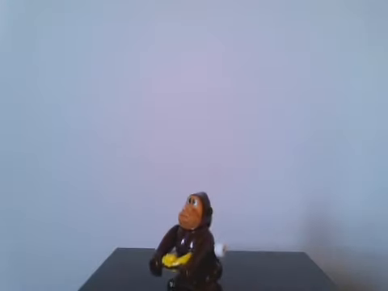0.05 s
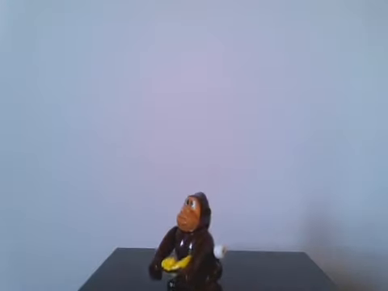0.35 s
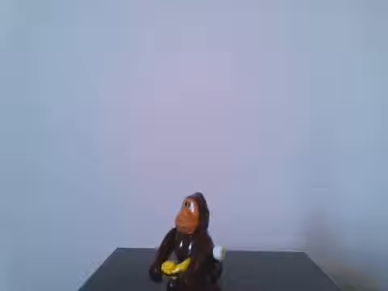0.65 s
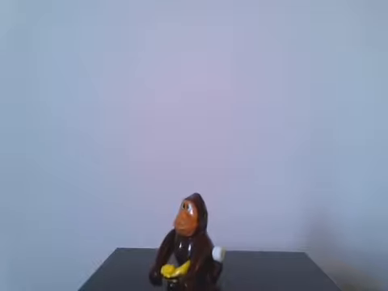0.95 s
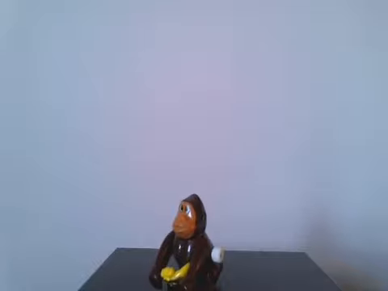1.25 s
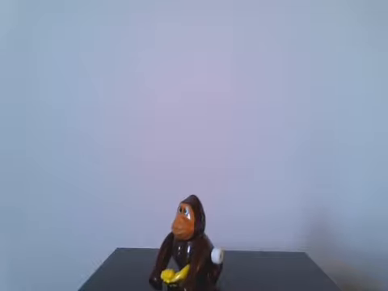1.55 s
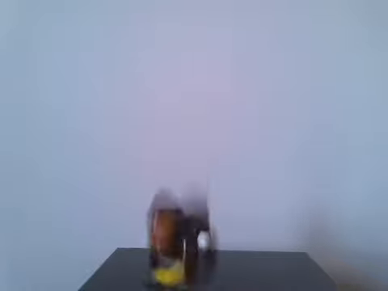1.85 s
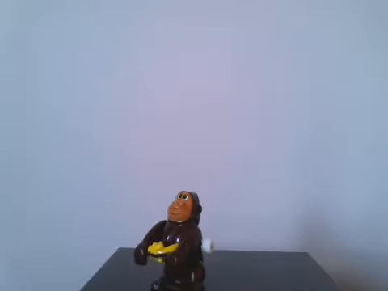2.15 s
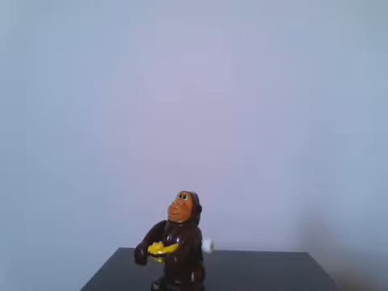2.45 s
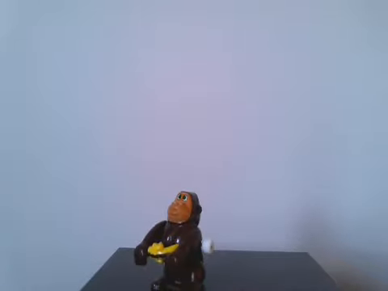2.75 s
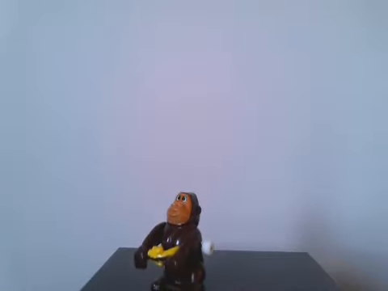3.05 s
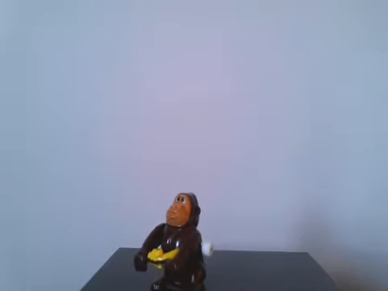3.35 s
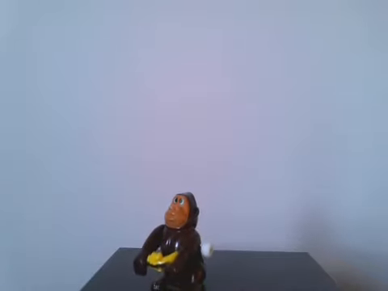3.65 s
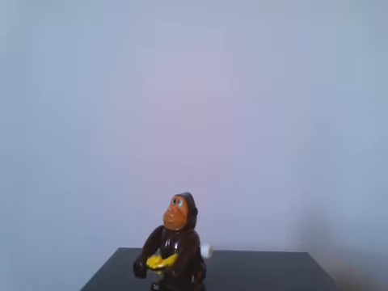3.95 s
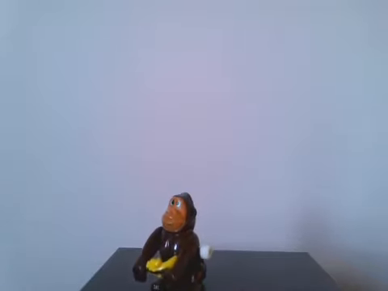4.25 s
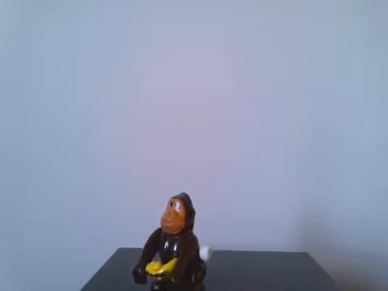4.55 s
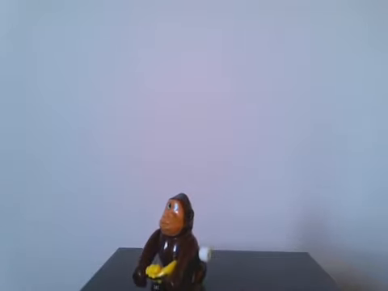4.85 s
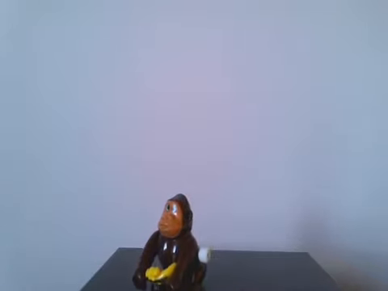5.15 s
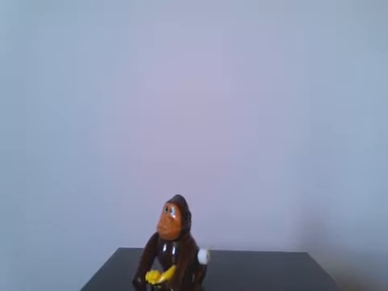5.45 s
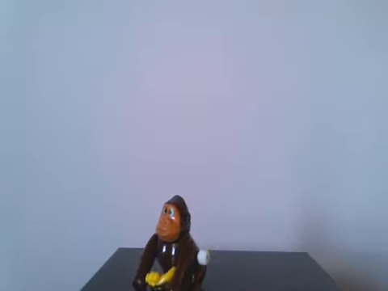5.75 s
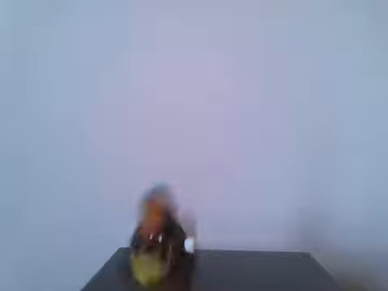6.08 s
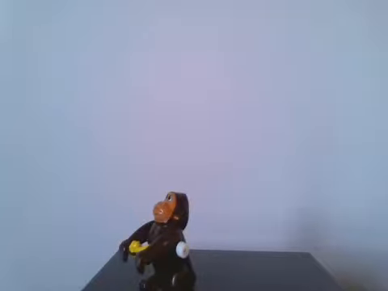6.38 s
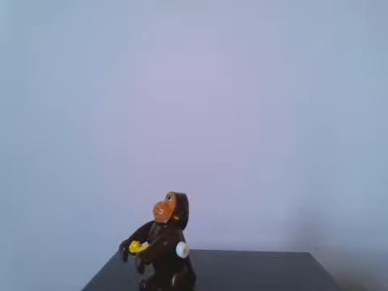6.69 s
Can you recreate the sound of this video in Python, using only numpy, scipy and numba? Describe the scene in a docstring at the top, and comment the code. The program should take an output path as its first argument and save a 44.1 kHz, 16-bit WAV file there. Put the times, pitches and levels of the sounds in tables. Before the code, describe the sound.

A plastic wind-up toy whirs faintly on a hard tabletop in a small, quiet room. The gears slow and rasp a little as the spring loads, then a catch snaps and the toy flips, landing with a loud, sharp double clack. The whir carries on for about four seconds, with tiny foot scuffs, before a second snap and clattering landing. The nearby microphone overloads slightly on the landings, and the impacts die away quickly.

```python
"""A plastic wind-up toy leans forward on a hard table in a small room, its gear train whirring.
The whir slows as a cam bends the rasping leg spring, then quickens as the load eases.
The catch snaps, the toy flies for a sixth of a second, lands, bounces and rocks to rest; each impact
excites shell, table and room. It leans again, feet scuffing, and turns a second backflip.
Throughout, a noise suppressor lifts only the strong sounds, which cuts the tails short."""
import sys
import numpy as np
from scipy import signal
from scipy.fft import rfft, irfft, next_fast_len
from scipy.io import wavfile
from scipy.ndimage import uniform_filter1d
from numba import njit

SR = 44100
rng = np.random.default_rng(int(sys.argv[2]) if len(sys.argv) > 2 else 0)


def log_audio(samples):
    """Write samples as a 16-bit WAV file to the path given in sys.argv[1]."""
    # one column per channel
    frames = np.atleast_2d(samples).T
    # limit to full scale, then quantise
    limited = np.clip(frames, -1, 1)
    pcm = np.round(limited * 32767).astype(np.int16)
    wavfile.write(sys.argv[1], SR, pcm)


N = 296352
T = np.arange(N) / SR


def undb(db):
    """Logarithmic level: decibels to an amplitude ratio."""
    return 10 ** (np.asarray(db) / 20)


def unit(x):
    """Normalisation to an rms of 1."""
    return x / np.sqrt(np.mean(x ** 2))


def decay(t, t60):
    """Exponential damping, 60 dB down after t60."""
    return np.exp(-np.log(1000) * t / t60)


def add(out, start_s, x):
    """Superposition: mix x into out from start_s."""
    i = max(int(start_s * SR), 0)
    out[i:i + len(x)] += x[:N - i]


def lookup(points, hz):
    """Interpolation of (frequency, value) points on a log-frequency axis."""
    f, value = np.transpose(points)
    return np.interp(np.log(hz + 1), np.log(f), value)


def colour(x, points, peaks=(), tilt_db=0):
    """Minimum-phase filter of unit power: a spectrum, resonant peaks and a tilt per octave above 500 Hz."""
    n = next_fast_len(len(x))
    n += n % 2
    hz = np.arange(n // 2 + 1) * SR / n
    db = lookup(points, hz) + tilt_db * np.log2(np.maximum(hz, 500))
    for f, width, height_db in peaks:
        db = db + height_db / (1 + (2 * (hz - f) / width) ** 2)
    cepstrum = irfft(np.log(unit(undb(db))))
    cepstrum[1:n // 2] *= 2  # folding the cepstrum makes the filter causal
    cepstrum[n // 2 + 1:] = 0
    return irfft(rfft(x, n) * np.exp(rfft(cepstrum)))[:len(x)]


def whiten(x):
    """Whitening in third octaves: a flat spectrum of unit energy that keeps its fine comb of peaks."""
    spectrum = rfft(x)
    hz = np.arange(len(spectrum)) * SR / len(x)
    band = (3 * np.log2(np.maximum(hz, 100) / 100)).astype(int)
    power = np.bincount(band, np.abs(spectrum) ** 2) / np.bincount(band)
    centre_hz = np.bincount(band, hz) / np.bincount(band)
    flat = colour(x, np.column_stack([centre_hz, -10 * np.log10(power)]))
    return flat / np.sqrt(np.sum(flat ** 2))


@njit
def bandpass(x, hz, width_hz):
    """Second-order resonator in state-variable form; its centre may move."""
    y, band, low = np.empty(len(x)), 0., 0.
    for i in range(len(x)):
        g, damping = np.tan(np.pi * hz[i] / SR), width_hz / hz[i]
        v = (band + g * (x[i] - low)) / (1 + g * (g + damping))
        band, low = 2 * v - band, low + 2 * g * v
        y[i] = damping * v
    return y


def resonate(x, hz, width_hz):
    """Two equal resonators in cascade, each width_hz wide, give steeper skirts."""
    centre = np.full(len(x), hz, dtype=float)
    return bandpass(bandpass(x, centre, float(width_hz)), centre, float(width_hz))


# spectrum of still room air (frequency [Hz], relative level [dB])
AIR_SPECTRUM = [(25, -30.5), (60, -13), (130, 0.5), (200, 1.5), (380, -5.5), (560, -5.5), (900, -16.5),
                (1500, -18), (5000, -14), (16000, -34.5)]
# resonances of table and room (frequency [Hz], width [Hz], gain [dB])
HOLLOW_PEAKS = [(120, 20, 3.5), (285, 17, 4.5), (367, 50, -2.5), (457, 22, 9), (589, 25, 8), (766, 28, 5.5),
                (960, 76, 5)]
def air(level_db=-65.5):
    """Filtered broadband noise: the quiet low rush of the room."""
    return undb(level_db) * colour(rng.standard_normal(N), AIR_SPECTRUM, HOLLOW_PEAKS)


# dull hums of the tabletop, scuffs of the feet as the weight shifts, a longer hum of the tabletop swelling
# before the first jump # each (centre time [s], duration [s], frequency [Hz], crest level [dB])
TABLE_HUMS = [(.21, .18, 285, -61.5), (.745, .12, 298, -59), (1.055, .14, 139, -60.5),
              (1.29, .13, 159, -61.5), (1.4, .08, 152, -62), (1.5, .16, 157, -59.5),
              (2.215, .06, 186.5, -59), (3.76, .26, 292, -64), (5.21, .13, 159.4, -63),
              (5.32, 0.077, 300, -63)]
FOOT_SCUFFS = [(2.91, .22, 4993, -64.5), (3.4, 0.039, 3222, -63), (3.45, .06, 4100, -62),
               (3.54, .15, 3927, -57.5), (3.64, .16, 3965, -64.5), (3.775, .045, 3916, -61)]
TABLE_SWELLS = [(1.705, .24, 523, -58.5)]
def rubbing(events, width_hz):
    """Forced resonance: friction noise swells and fades in one narrow band."""
    out = np.zeros(N)
    for centre_s, length_s, hz, db in events:
        n = int(length_s * SR)
        rub = resonate(rng.standard_normal(2 * n), hz, width_hz)[n:]  # steady state only
        swell = np.hanning(n)
        add(out, centre_s - length_s / 2, undb(db) * unit(rub * swell) * np.sqrt(np.mean(swell ** 2)))
    return out


FREE_HZ = 569  # tooth rate of the unloaded gears
# the cam pushes from LOAD_S before release to RUNOUT_S after; skew over 1 delays the hardest push
LOAD_S, RUNOUT_S, LOAD_SKEW = 3.5, .2, 1.05
STAND_S, LEAN_S = 0.41, 1.7  # after landing the toy stands upright, then leans forward
# backflips (release [s], landing [s], slowest tooth rate [Hz], whir change at the new spot [dB])
FLIPS = [(1.785, 1.944, 270, -0.35), (5.992, 6.156, 212, -3)]
def motion():
    """Speed falls with load. Gives load 0-1, tooth rate [Hz], uprightness 0-1, flight 0-1, spot [dB]."""
    load, upright, flight, spot_db = np.zeros((4, N))
    tooth_hz = np.full(N, float(FREE_HZ))
    for release_s, landing_s, slowest_hz, change_db in FLIPS:
        turn = np.clip((T - release_s + LOAD_S) / (LOAD_S + RUNOUT_S), 0, 1)
        push = np.abs(np.sin(np.pi * turn ** LOAD_SKEW))
        load += push
        tooth_hz -= (FREE_HZ - slowest_hz) * push
        flight_s = landing_s - release_s
        upright += np.interp(T, np.cumsum([release_s, flight_s, STAND_S, LEAN_S]), [0, 1, 1, 0])
        flight += uniform_filter1d(1. * ((T > release_s) & (T < landing_s)), size=900)
        spot_db += change_db * np.clip((T - release_s) / flight_s, 0, 1)
    return load, tooth_hz, np.clip(upright, 0, 1), flight, spot_db


def gear_mesh(tooth_hz, paths, jitter=0.04, scatter_db=-1.5, limp=.24, tick_s=0.00093, rub=.7):
    """Amplitude-modulated noise, one row per path: each tooth ticks, then rubs, more at speed."""
    wobble = unit(uniform_filter1d(rng.standard_normal(N), size=300))
    passed = np.cumsum(tooth_hz * (1 + jitter * wobble)) / SR
    tooth = passed.astype(int)
    force = undb(scatter_db * rng.standard_normal(N)[tooth])
    force *= 1 + limp * (-1.) ** tooth  # every other tooth is stronger
    sway = undb(-0.53 * np.sin(2 * np.pi * passed / 22))  # a 22-tooth wheel runs out of true
    contact = rub * tooth_hz / FREE_HZ + force * np.exp(-(passed % 1) / tooth_hz / tick_s)
    running_rms = np.sqrt(uniform_filter1d(contact ** 2, size=4410))
    return unit(rng.standard_normal((paths, N)) * sway * contact / running_rms)


def spring_rasp(centre_hz=3850, width_hz=900, loaded_db=-69, slack_db=-95):
    """Sliding friction: the spring's coils rub tooth by tooth, most under full load."""
    load, tooth_hz, *_ = motion()
    rub = gear_mesh(tooth_hz, paths=1)[0]
    return undb(slack_db + (loaded_db - slack_db) * load) * unit(resonate(rub, centre_hz, width_hz))


# case resonances in three postures (frequency [Hz], width [Hz], gain [dB])
LEANING_PEAKS = [(2490, 160, 5), (3400, 220, 2.5), (4070, 260, 5.5), (4870, 170, 6.5), (5750, 320, 8),
                 (6890, 240, 6.5), (8904, 600, 3.5), (10700, 500, 2)]
HALFWAY_PEAKS = [(2540, 300, 7), (3363, 200, 3), (4000, 410, -6), (4760, 400, 4.5), (5700, 280, 4),
                 (6300, 400, 3.5), (7830, 440, 4), (9300, 500, 2.5)]
UPRIGHT_PEAKS = [(2520, 360, 2.2), (3500, 250, 1.2), (4770, 130, 2.7), (5900, 430, 8), (7840, 910, 5.1),
                 (8217, 110, 6), (11070, 700, 6.2), (15000, 700, 5)]
def through_case(x, spectrum, upright):
    """Resonance depends on shape: the case blends the peaks of the two nearest postures."""
    return sum(np.maximum(1 - np.abs(2 * upright - k), 0) * colour(x, spectrum, peaks)
               for k, peaks in enumerate([LEANING_PEAKS, HALFWAY_PEAKS, UPRIGHT_PEAKS]))


# spectra of the gearbox, the tooth sizzle and the body under it (frequency [Hz], relative level [dB])
GEARBOX_SPECTRUM = [(1500, -18), (2100, -10), (2700, -1.5), (4000, -0.5), (5700, -2.5), (7000, -4.5),
                    (8200, -8.5), (10000, -23), (16000, -35.5)]
SIZZLE_SPECTRUM = [(5000, -29), (8000, -7.5), (9200, 3), (11000, -4.5), (13500, -7), (15500, -14)]
BODY_SPECTRUM = [(300, -7.5), (560, 4), (900, 4.5), (1300, 1), (2100, 9), (3200, -19.5)]
# whir paths (free-running level [dB], rise with speed [dB/octave], upright gain [dB], mid-air gain [dB])
CASE_LEVELS = (-55, 7, -4, -5)
SIZZLE_LEVELS = (-67.5, 6.5, .3, -3.5)
BODY_LEVELS = (-69, 5, 2.5, -8.5)
SLOT_LEVELS = (-64.5, 10.5, 2, -4)
def gear_whir(slot_open_hz=7200, slot_shut_hz=5500):
    """Source and filter: tooth ticks sound through the case, the body and the slot above the legs."""
    load, tooth_hz, upright, flight, spot_db = motion()
    ticks, fine_ticks, slot_ticks = gear_mesh(tooth_hz, paths=3)

    def gain(free_db, speed_db, upright_db, flight_db):
        """Excitation and coupling: faster teeth hit harder; in mid-air the table carries no sound."""
        octaves = np.log2(tooth_hz / FREE_HZ)
        return undb(free_db + speed_db * octaves + upright_db * upright + flight_db * flight + spot_db)

    case = gain(*CASE_LEVELS) * through_case(ticks, GEARBOX_SPECTRUM, upright)
    sizzle = gain(*SIZZLE_LEVELS) * through_case(fine_ticks, SIZZLE_SPECTRUM, upright)
    body = gain(*BODY_LEVELS) * colour(ticks, BODY_SPECTRUM, HOLLOW_PEAKS)
    slot_hz = slot_open_hz + (slot_shut_hz - slot_open_hz) * load  # the cam presses the slot shut
    slot = gain(*SLOT_LEVELS) * unit(resonate(slot_ticks, slot_hz, width_hz=1500))
    return case + sizzle + body + slot


# reverberation of the room (frequency [Hz], T60 [s])
ROOM_DECAY = [(100, 0.99), (400, 0.35), (1100, 0.32), (2000, 0.27), (3600, 0.22), (6500, .175),
              (15000, 0.15)]
def reverberation(t, build_s=.003):
    """Diffuse field: dense echoes build up quickly and die sooner in the treble."""
    spectrum = rfft(rng.standard_normal(len(t)))
    hz = np.arange(len(spectrum)) * SR / len(t)
    octave = np.round(np.log2(np.maximum(hz, 100)))
    tail = sum(irfft(spectrum * (octave == k), len(t)) * decay(t, lookup(ROOM_DECAY, 2 ** k))
               for k in np.unique(octave))
    return tail * (1 - np.exp(-t / build_s))


def ring(modes, t, detune, scatter_db):
    """Modal superposition: each blow hits another spot, so strengths and pitches vary a little."""
    out = np.zeros(len(t))
    for k, (hz, db, t60) in enumerate(modes):
        level_draw, pitch_draw = rng.standard_normal(2)
        tone = np.sin(2 * np.pi * hz * (1 + detune * pitch_draw) * t)
        out += (-1) ** k * undb(db + scatter_db * level_draw) * decay(t, t60) * tone
    return out


# modes of the table (frequency [Hz], relative level [dB], T60 [s])
TABLE_MODES = [(74, -17.5, 0.8), (98, -12.5, .33), (131.7, -10, 0.51), (170.5, -9.5, 0.11),
               (183.3, -4, 0.36), (203, -7, 0.58), (234, -6, 0.21), (285, 2, 0.28), (437, -1.5, .17),
               (502, -5, 0.2), (526.5, -5, 0.23), (583, -11.5, 0.093)]
def table_ring(t, push_hz, rise_s=0.0076):
    """Plate vibration: a soft push moves only the low modes, and the heavy top is slow to get going."""
    modes = [(hz, db - 10 * np.log10(1 + (hz / push_hz) ** 4), t60) for hz, db, t60 in TABLE_MODES]
    return ring(modes, t, detune=0.0027, scatter_db=-2.5) * (1 - np.exp(-t / rise_s))


# modes of the hollow shell (frequency [Hz], relative level [dB])
SHELL_MODES = [(1205, 0.5), (1800, -5), (1900, -3), (2285, -5.5), (2395, -2.5), (2713, 1.5), (3040, -3.5),
               (3230, 4), (3810, -8), (4395, -8), (4810, -3.5), (5800, -2.5), (6100, 0), (6540, -1.5)]
def shell_ring(t, t60=.11):
    """Damped free vibration of the struck plastic shell."""
    return ring([(hz, db, t60) for hz, db in SHELL_MODES], t, detune=0.0017, scatter_db=-3.5)


def impacts(events, spectrum, peaks, crack_t60, rattle_db, room_db, shell_db, table_db, push_hz):
    """Impulsive excitation: each blow clicks, rattles loose parts, and rings shell, table and room."""
    out, t = np.zeros(N), np.arange(SR // 2) / SR
    for start_s, db, tilt_db, thump_db in events:
        grains = np.repeat(undb(4 * rng.standard_normal(len(t))), 24)[:len(t)]  # 4 dB of roughness
        crack = unit(grains * rng.standard_normal(len(t))) * decay(t, crack_t60)
        crack[0] += undb(11)  # the click of first contact
        rattle = undb(rattle_db) * whiten(crack + undb(room_db) * reverberation(t))
        shell = undb(shell_db) * shell_ring(t)
        table = undb(table_db + thump_db) * table_ring(t, push_hz)
        add(out, start_s, undb(db) * (colour(rattle, spectrum, peaks, tilt_db) + shell + table))
    return out


# catch and leg kicks (time [s], level [dB], tilt [dB/octave], relative table thump [dB])
KICKS = [(1.7853, -36, -2, -15), (1.7872, -30, 2, 1), (1.7935, -30.5, -3, -12), (1.7985, -33.5, 2, -12.5),
         (1.8022, -31, -0.5, -6), (5.9920, -30.5, -2.5, -6.5), (5.9975, -31.5, -3.5, -5.5),
         (6.0048, -28, -1, -5.5)]
# spectrum of the snap inside the shell (frequency [Hz], relative level [dB])
SNAP_SPECTRUM = [(60, -13.5), (130, 14), (280, 6.5), (360, -1), (500, 4.5), (900, -0.5), (1600, -2),
                 (2200, -0.5), (3200, 1.5), (4600, 1), (6600, -2.5), (7900, -10), (16000, -20)]
# resonances of the spring's snap (frequency [Hz], width [Hz], gain [dB])
SPRING_PEAKS = [(770, 26, 4.9), (1920, 300, 6.8), (2650, 400, 7.5), (6150, 700, 10)]
def take_offs():
    """Release of elastic energy: the catch lets go and the spring kicks the legs against the table."""
    return impacts(KICKS, SNAP_SPECTRUM, SPRING_PEAKS, crack_t60=0.022, rattle_db=16.0,
                   room_db=-16, shell_db=-34.5, table_db=-12.5, push_hz=300)


# the feet land, bounce and rock (time [s], level [dB], tilt [dB/octave], relative table thump [dB])
FOOTFALLS = [(1.9435, -16, 0.2, -12), (1.95, -9.5, 2.5, -10.5), (1.9797, -24, -8.5, -2),
             (1.9872, -28, 2.5, -3.5), (2.0279, -12, -1.4, -10.5), (6.1525, -14.5, 0, -9.5),
             (6.1601, -14, 0.3, -9), (6.182, -31, 2.5, -2.5), (6.2085, -10.5, -2, -7),
             (6.269, -29.5, 0.5, -4.5), (6.319, -37.5, 0, -4)]
# a rebound chatter after each blow (shortest delay [s], longest delay [s], relative level [dB], extra table
# thump [dB])
REBOUND = (.003, .006, -10, 3)
# spectrum of plastic striking the tabletop (frequency [Hz], relative level [dB])
CLACK_SPECTRUM = [(25, -33), (60, -15), (150, -5.5), (280, 0), (360, -7.5), (480, 0.5), (1050, 1),
                  (1450, -2.5), (2000, 0), (3200, 2), (4300, 2.5), (6700, 2.5), (7900, -10.5), (16000, -21)]
# resonances of the striking feet (frequency [Hz], width [Hz], gain [dB])
FOOT_PEAKS = [(530, 260, 6), (732, 23, 6), (925, 61, 5), (1055, 93, 2.5), (1770, 120, 5), (2370, 90, 1.5),
              (3050, 220, 2.5), (6200, 400, 2.5)]
def landings():
    """Inelastic collisions: the feet strike the hard table, and each blow chatters once more just after."""
    soonest_s, latest_s, softer_db, extra_thump_db = REBOUND
    chatter = [(s + rng.uniform(soonest_s, latest_s), db + softer_db, tilt_db, thump_db + extra_thump_db)
               for s, db, tilt_db, thump_db in FOOTFALLS]
    return impacts(FOOTFALLS + chatter, CLACK_SPECTRUM, FOOT_PEAKS, crack_t60=.027, rattle_db=16.5,
                   room_db=-16.5, shell_db=-26.5, table_db=-16, push_hz=1400)


def scene():
    """Superposition of toy, table and room at one microphone."""
    hums = rubbing(TABLE_HUMS, width_hz=64)
    creak = rubbing(TABLE_SWELLS, width_hz=77)
    scuffs = rubbing(FOOT_SCUFFS, width_hz=900)
    return (hums + creak + scuffs + take_offs() + landings() + gear_whir() + spring_rasp() + air())[None]


def suppress_noise(x, margin_db=11, knee_db=4.5, lift_db=12):
    """Spectral gating with make-up gain: bands well above their median level are lifted."""
    _, _, spectra = signal.stft(x, nperseg=512, noverlap=384)
    power = uniform_filter1d(np.abs(spectra) ** 2, size=5, axis=0)
    power = uniform_filter1d(power, size=5, axis=1)
    over_db = 10 * np.log10(np.maximum(power / np.median(power, axis=1, keepdims=True), 1e-9))
    opening = .5 + .5 * np.tanh((over_db - margin_db) / (2 * knee_db))
    return signal.istft(spectra * undb(lift_db * opening), nperseg=512, noverlap=384)[1][:N]


def record(dry, low_cut_hz=45, high_cut_hz=15900):
    """Gating, clipping and band limiting: the landings overload the recorder; deep bass and top are cut."""
    clipped = np.clip(suppress_noise(dry[0]), -1, 1)[None]
    thinned = signal.sosfilt(signal.butter(1, low_cut_hz, "high", fs=SR, output="sos"), clipped)
    return signal.sosfilt(signal.ellip(12, .2, 90, high_cut_hz, fs=SR, output="sos"), thinned)


dry = scene()
out = record(dry)
log_audio(out)
```